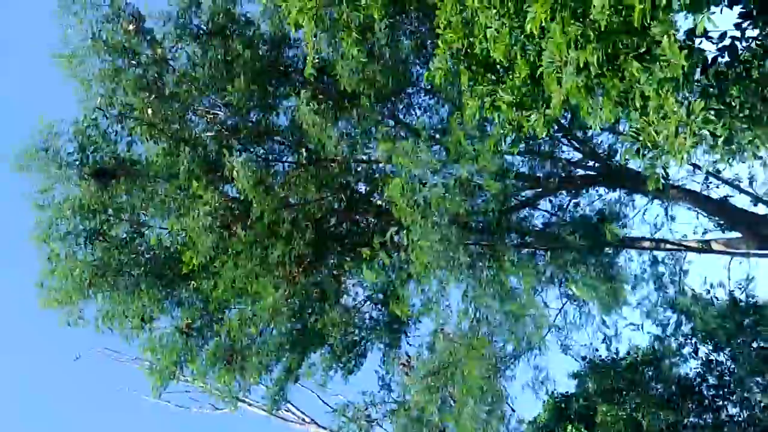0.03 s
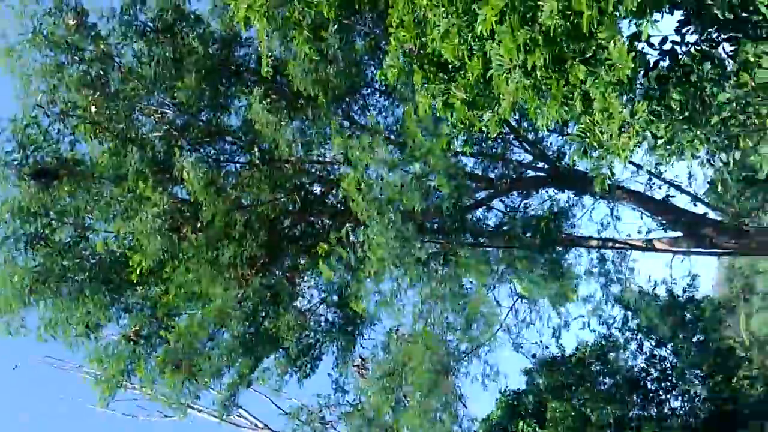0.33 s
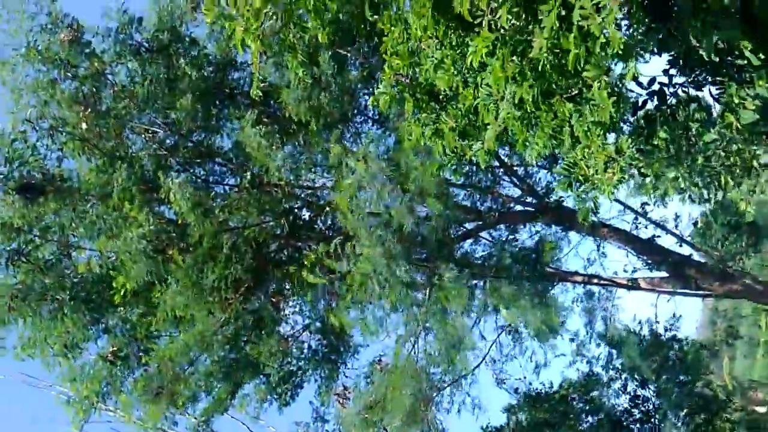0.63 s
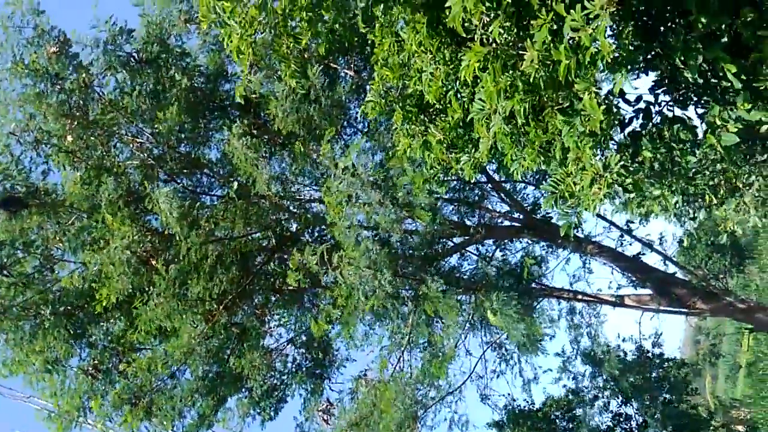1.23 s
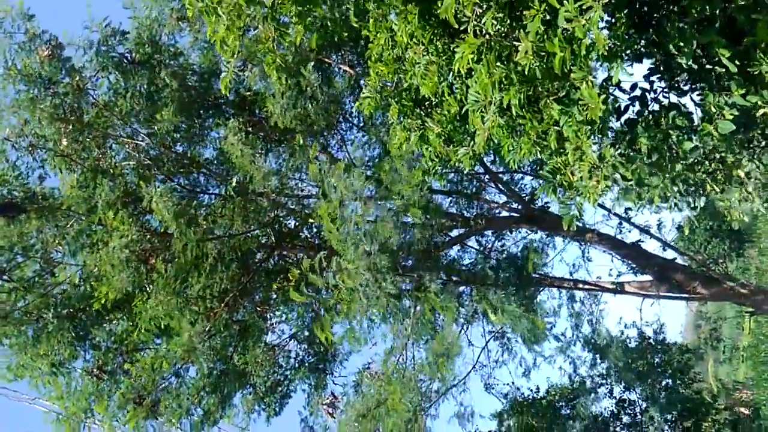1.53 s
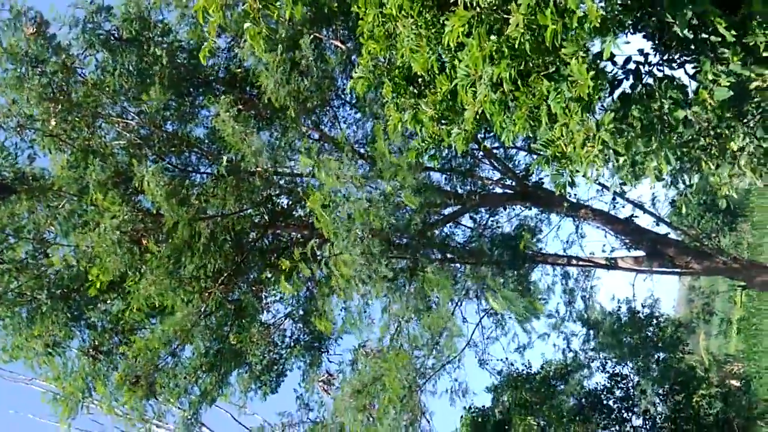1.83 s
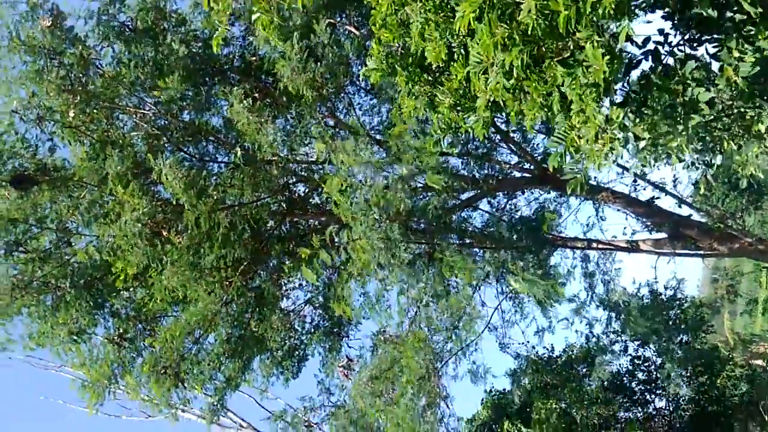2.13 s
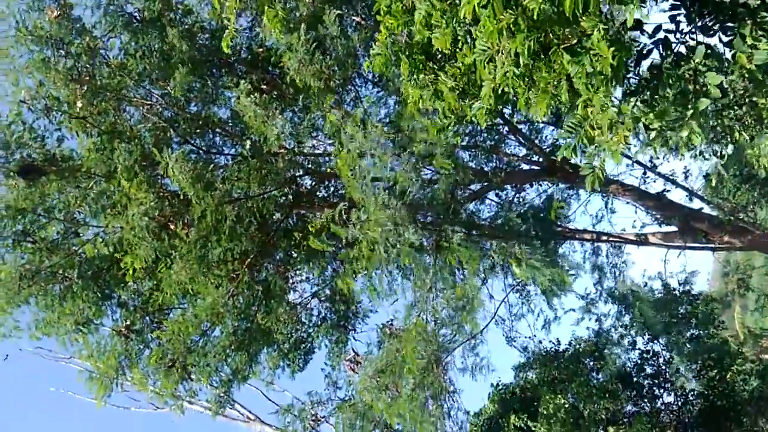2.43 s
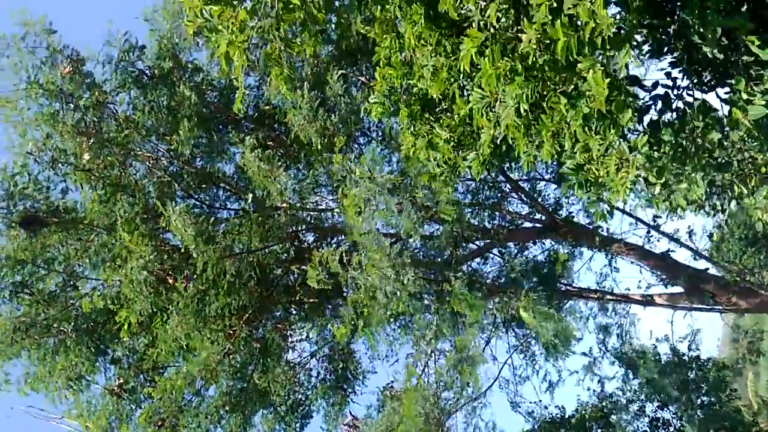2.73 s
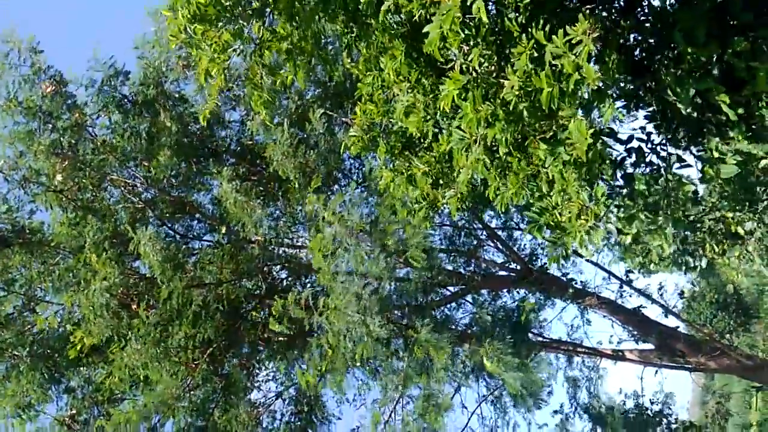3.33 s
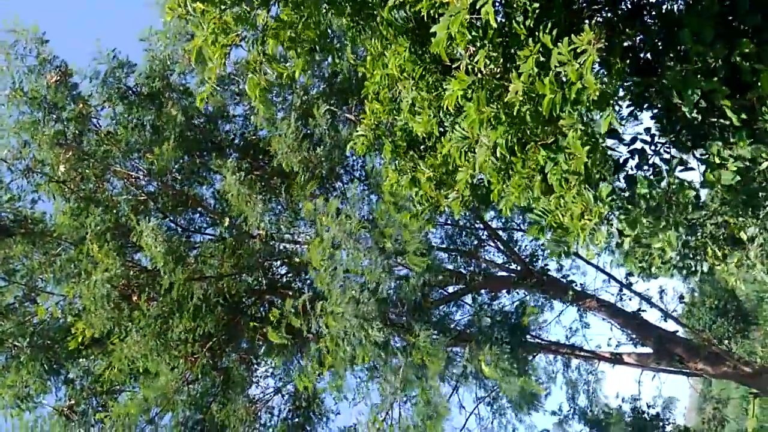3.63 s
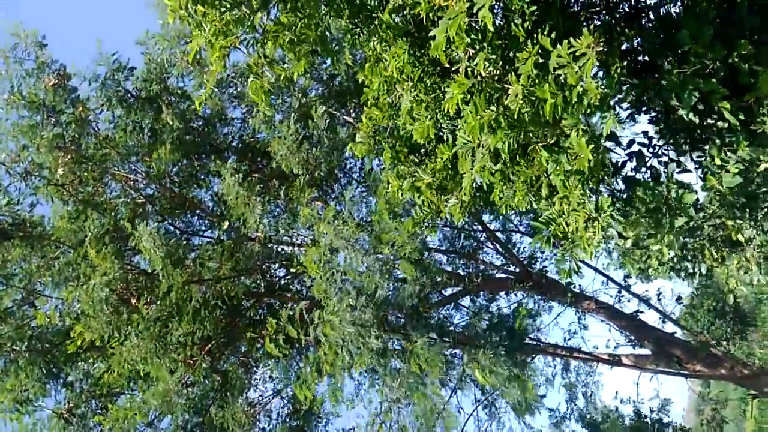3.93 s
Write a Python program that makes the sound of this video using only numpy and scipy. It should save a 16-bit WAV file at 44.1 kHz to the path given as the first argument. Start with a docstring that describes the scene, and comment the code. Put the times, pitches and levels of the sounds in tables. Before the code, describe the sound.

A bird whistles a loud, clear two-note call three times, each echoing softly among trees. A small bird twitters faintly and high in between, while leaves hiss quietly and a breeze rumbles on the microphone.

```python
"""In a wood, a bird whistles a loud, fluting two-note call three times over; trunks and leaves
scatter it into a soft tail. A small bird twitters high above it in quick sliding whistles.
Far off, other birds call and an animal repeats a cry made hoarse by a throb in its voice.
Leaves hiss faintly and stir once, a breeze buffets the microphone, and a dull scuff comes at the end."""
import sys
import numpy as np
from scipy import signal
from scipy.fft import rfft, irfft
from scipy.io import wavfile
from scipy.ndimage import uniform_filter1d

SR = 44100
rng = np.random.default_rng(int(sys.argv[2]) if len(sys.argv) > 2 else 0)


def digitize_waveform(pressure):
    """Quantize a signal to 16-bit integers and store it at the path in sys.argv[1].

    Rows of a 2-D input are taken as channels; values are limited to [-1, 1].
    """
    field = np.atleast_2d(pressure).T
    bounded = np.clip(field, -1, 1)
    quanta = np.round(bounded * 32767).astype(np.int16)
    wavfile.write(sys.argv[1], SR, quanta)


N = 176400
T = np.arange(N) / SR
LEAD = SR   # the calls' tracks begin one second early, so the wood is already ringing at the start


def from_db(db):
    """Turn decibels into a gain."""
    return 10 ** (np.asarray(db) / 20)


def rms_one(x):
    """Scale a signal to an average strength (rms) of 1."""
    return x / np.sqrt(np.mean(x ** 2) + 1e-20)


def in_time(rows):
    """Join (time_s, value) points with straight lines, giving a value at every sample."""
    return np.interp(T, *np.transpose(rows))


def drift(rate_hz, size):
    """A smooth random wobble of about 1 either way; a higher rate wobbles faster."""
    step = 40   # samples between random values
    memory = np.exp(-2 * np.pi * rate_hz * step / SR)
    draws = rng.standard_normal(N // step + 2002)
    slow = signal.lfilter([1], [1, -2 * memory, memory * memory], draws)[2000:]
    return np.interp(np.arange(size) / step, np.arange(len(slow)), rms_one(slow))


def colour(x, points):
    """Turn a sound's lows and highs up or down along (frequency_hz, gain_db) points."""
    hz, db = np.transpose(points)
    gain_db = np.interp(np.log(np.fft.rfftfreq(N, 1 / SR) + 1), np.log(hz), db)
    return irfft(rfft(x) * from_db(gain_db), N)


def noise(points):
    """Noise of strength 1, its tone set by (frequency_hz, gain_db) points."""
    return rms_one(colour(rng.standard_normal(N), points))


def add(out, start_s, x):
    """Mix a sound into a track that begins LEAD samples early."""
    i = max(int(start_s * SR) + LEAD, 0)
    out[i:i + len(x)] += x[:len(out) - i]


def whistle_notes(shape, notes):
    """A nearly pure whistle glides along a shape; high notes are pressed and so brighter."""
    # faint higher tones: pitch_multiple, level_db, growth_db_per_octave, flutter_radians
    overtones = [(2, -41, 40, .1), (3, -25.5, 77, .2), (4, -49, 33.5, .7), (5, -56, 2, 1.0),
                 (6, -41.5, 42, 1.1), (7, -51.5, 3, 1.4)]
    reference_hz, growth_floor_db = 2145, -21
    catch_s, catch_width_s, catch_db = .737, 0.0064, 50   # the voice catches once
    out = np.zeros(N + LEAD)
    shape_s, shape_hz, shape_db = np.transpose(shape)
    for start_s, pitch_ratio, stretch, level_db, bright_db in notes:
        t = np.arange(int(shape_s[-1] * stretch * SR)) / SR
        glide_hz = uniform_filter1d(np.interp(t / stretch, shape_s, shape_hz), size=400, mode="nearest")
        hz = pitch_ratio * glide_hz * (1 + 0.002 * drift(43, len(t)))
        phase = 2 * np.pi * np.cumsum(hz) / SR
        db = np.interp(t / stretch, shape_s, shape_db) + level_db + 1.2 * drift(30, len(t))
        db -= catch_db * np.exp(-((start_s + t - catch_s) / catch_width_s) ** 2)
        tone = np.sin(phase)
        for multiple, overtone_db, db_per_octave, flutter in overtones:
            growth_db = np.maximum(db_per_octave * np.log2(hz / reference_hz), growth_floor_db)
            gain = from_db(overtone_db + bright_db + growth_db + 3 * drift(74, len(t)))
            tone += gain * np.sin(multiple * phase + flutter * drift(170, len(t)))
        fade = np.clip(np.minimum(t, t[-1] - t) / .008, 0, 1)   # 8 ms at each end
        add(out, start_s, fade * from_db(db) * tone)
    return out


def whistling_bird():
    """The loud bird's call: a note that arches twice, then a swoop that ends in a warble."""
    # the shape of each note: time_in_note_s, pitch_hz, level_db
    arch = [(0, 1520, -53), (.015, 1884, -42), (.033, 2134, -33.5), (.052, 2180, -29), (.086, 2080, -28),
            (.127, 2206, -28), (.162, 2215, -28.5), (.193, 1985, -28.5), (.223, 1799, -32.5),
            (.243, 1626, -46.5), (.253, 1590, -74.5)]
    swoop = [(0, 1493, -55), (.019, 2094, -38.5), (.034, 2315, -32), (.049, 2354, -29.5),
             (.067, 2279, -30.5), (.094, 1900, -33), (.116, 1737, -31), (.149, 1427, -47.5),
             (.174, 1367, -55), (.189, 1461, -47), (.202, 1753, -34), (.214, 1937, -32),
             (.231, 1738, -31.5), (.249, 1895, -32), (.272, 1818, -33.5), (.298, 1786, -38),
             (.312, 1680, -42.5), (.322, 1630, -53.5)]
    # each time it is sung: start_s, pitch_ratio, length_ratio, level_db, overtones_db
    arches = [(0.653, 0.99, 1.01, -4.5, 1.5), (2.185, 1.0, 1.006, -3, -1), (3.539, 1.045, 1.06, -3, 0)]
    swoops = [(-.57, .98, 1.0, 0, 0), (1.029, .998, 1.0, 0, 1.5), (2.559, 1.0, 1.016, 0, 1),
              (3.926, 1.027, 1.0, -2, -1.5)]
    return whistle_notes(arch, arches) + whistle_notes(swoop, swoops)


def tree_echoes(x):
    """Dense echoes: a quick bloom from near treetops and a longer, duller tail from the wood."""
    first_echo_s, build_s = 0.0044, 0.0036
    t = np.arange(int(1.5 * SR)) / SR
    swell = 1 - np.exp(-np.maximum(t - first_echo_s, 0) / build_s)

    def scatter(level_db, fade_s):
        """Countless echoes blur into noise that falls 60 dB in fade_s."""
        return from_db(level_db) * rms_one(rng.standard_normal(len(t)) * swell * from_db(-60 * t / fade_s))

    early = scatter(level_db=-11.5, fade_s=0.74)
    late = scatter(level_db=-15.5, fade_s=0.94)
    foliage = signal.butter(2, 3930, fs=SR, output="sos")   # leaves soak up the tail's treble
    echoes = early + signal.sosfilt(foliage, late)
    return signal.fftconvolve(x, echoes / np.sqrt(len(t)))[:len(x)]


def leaves_and_airy_hiss(whistle):
    """Leaves hiss and stir once, and an airy hiss follows the whistle; in stereo, wide only up high."""
    # loudness of the leaves and of an extra high hiss: time_s, level_db
    leaf_levels = [(0, -68), (.55, -73), (1.3, -65.5), (1.7, -68.5), (2.15, -68.5), (2.8, -68.5),
                   (3.3, -71), (4, -69.5)]
    treble_levels = [(0, -77.5), (.55, -76), (.75, -70), (1.0, -75), (1.15, -81), (1.45, -79), (1.9, -80),
                     (2.15, -90), (2.4, -68.5), (2.55, -79), (2.88, -78), (2.98, -87), (3.5, -85),
                     (3.65, -73), (3.88, -77), (4, -83)]
    # the tone of each hiss: frequency_hz, gain_db
    leaf_tone = [(100, -2.5), (400, -0.5), (900, 0), (1500, -2), (3000, -2.5), (3800, -3), (5000, 2),
                 (5800, 9), (6700, 6.5), (7500, -2), (10000, -7), (14000, -14.5)]
    treble_tone = [(5000, -24), (7000, 1.5), (8500, 2.5), (11000, -4), (14000, -2)]
    rustle_tone = [(2500, -23), (4200, -15.5), (5800, 1.5), (7500, -11), (10000, -19.5), (14000, -24.5)]
    airy_tone = [(2500, -37.5), (3600, -30), (4400, 8.5), (5200, -2.5), (6400, 12), (7600, -19), (9200, -2),
                 (11000, -12.5), (13000, 0), (14000, -13)]
    # how much left and right differ: frequency_hz, gain_db
    width = [(100, -51), (3300, -39.5), (4800, -25.5), (6500, -11), (9000, -4), (14000, -5.5)]
    rustle_s, rustle_width_s = 1.546, 0.082
    leaves = from_db(in_time(leaf_levels) + .5 * drift(50, N))
    treble = from_db(in_time(treble_levels))
    rustle = from_db(-59 + 2 * drift(70, N)) * np.exp(-np.abs(T - rustle_s) / rustle_width_s)
    airy = from_db(-35.5) * uniform_filter1d(np.abs(whistle), size=900)
    layers = [(leaves, leaf_tone), (treble, treble_tone), (rustle, rustle_tone), (airy, airy_tone)]
    centre = sum(gain * noise(tone) for gain, tone in layers)
    side = sum(gain * noise(tone) for gain, tone in layers)
    return centre + colour(side, width) * np.array([[1], [-1]])


def breeze():
    """Wind on the microphone makes a lumpy rumble, with a higher flutter in some gusts."""
    # loudness of the rumble and the flutter: time_s, level_db
    rumble_levels = [(0.0, -90), (0.04, -59.5), (.09, -76), (0.11, -51.5), (.25, -63), (0.4, -61.5),
                     (0.43, -39), (0.56, -34.5), (0.66, -43), (.7, -40), (0.91, -39), (0.935, -52.5),
                     (1.03, -37), (1.13, -39), (1.18, -45), (1.24, -30.5), (1.365, -48.5), (1.39, -38.5),
                     (1.46, -41.5), (1.535, -51.5), (1.57, -36.5), (1.85, -37.5), (1.885, -47), (1.93, -38),
                     (1.99, -30.5), (2.04, -53), (2.07, -39), (2.26, -34.5), (3.0, -36), (3.12, -32),
                     (3.26, -43), (3.34, -40), (3.48, -41.5), (3.52, -33), (3.62, -35), (3.68, -46.5),
                     (3.75, -40.5), (4, -35.5)]
    flutter_levels = [(0, -94), (1.85, -79), (2.1, -62.5), (2.3, -55), (2.56, -84), (2.92, -56.5),
                      (3.25, -71.5), (3.56, -70.5), (3.75, -84), (4, -49.5)]
    # their tones: frequency_hz, gain_db
    rumble_tone = [(12, -43), (24, -25.5), (35, -10), (48, 2.5), (64, 7.5), (90, 1.5), (125, -3.5),
                   (165, -10), (245, -25.5), (350, -49), (500, -51), (800, -65.5), (1500, -80)]
    flutter_tone = [(80, -32.5), (200, 10), (300, 0.5), (450, -10.5), (700, -27.5), (1100, -22.5),
                    (2500, -54)]
    gusts = from_db(in_time(rumble_levels) - 1.5 + 2.5 * drift(39, N))
    rumble = noise(rumble_tone)
    swells = np.sqrt(uniform_filter1d(rumble ** 2, size=int(.05 * SR)) + .05)
    even_rumble = rumble / swells   # take out the noise's own chance swells
    flutter = from_db(in_time(flutter_levels) + 5 * drift(21, N)) * noise(flutter_tone)
    return gusts * even_rumble + flutter


def sliding_whistles(rows, bend_hz, jitter):
    """Short whistles that swell and fade as they slide, their pitch bent in the middle."""
    big_drop_hz, hang_hz = 1450, 550   # whistles that fall this far hang, then plunge
    out = np.zeros(N + LEAD)
    for start_s, length_s, from_hz, to_hz, level_db in rows:
        progress = np.linspace(0, 1, int(length_s * SR))
        hump = np.sin(np.pi * progress)
        hump_hz = hang_hz if from_hz - to_hz > big_drop_hz else bend_hz
        hz = from_hz + (to_hz - from_hz) * progress + hump_hz * hump
        hz *= 1 + jitter * drift(90, len(progress))
        add(out, start_s, from_db(level_db) * hump * np.sin(2 * np.pi * np.cumsum(hz) / SR))
    return out


def far_birds():
    """Distant birds give faint, gently falling whistles."""
    # each call: start_s, length_s, from_hz, to_hz, level_db
    calls = [(.02, 0.15, 2800, 2640, -77), (1.35, .38, 920, 842, -77.5), (2.04, .087, 2630, 2500, -69.5),
             (3.08, 0.46, 2673, 2270, -76)]
    return sliding_whistles(calls, bend_hz=11, jitter=0.0041)


def small_bird():
    """A small bird twitters in quick, high, sliding whistles."""
    # each chirp: start_s, length_s, from_hz, to_hz, level_db
    chirps = [(.31, 0.036, 5900, 5060, -67), (.475, 0.051, 4030, 3724, -66), (.51, 0.015, 3800, 4620, -67),
              (.522, 0.038, 5800, 5170, -60), (.568, 0.048, 6500, 5060, -55),
              (.715, 0.047, 5350, 5000, -66), (.748, 0.03, 6580, 4500, -60), (.82, 0.049, 5910, 5340, -58),
              (.84, 0.033, 6360, 5030, -50.5), (1.0, 0.029, 5280, 5000, -63),
              (1.075, 0.033, 4000, 3760, -66), (1.104, 0.015, 3890, 4870, -60),
              (1.118, 0.036, 5710, 5210, -51), (1.215, 0.042, 5870, 5800, -60),
              (1.305, 0.028, 5350, 4900, -63), (1.336, 0.026, 6900, 4630, -55.5),
              (1.402, 0.018, 4030, 4770, -58), (1.416, 0.031, 5780, 5300, -49.5),
              (1.642, 0.015, 6800, 4700, -61), (1.718, 0.036, 5800, 5180, -48),
              (1.905, .04, 4810, 4540, -59.5), (1.93, 0.035, 5800, 5200, -60),
              (1.968, 0.029, 5730, 5220, -56), (1.99, 0.026, 6070, 5650, -54.5),
              (2.695, 0.027, 4720, 3900, -64), (2.757, 0.025, 5750, 5100, -61),
              (3.078, 0.024, 7150, 6640, -60.5), (3.11, 0.02, 7000, 6200, -62.5),
              (3.462, 0.014, 5130, 4770, -65), (3.49, 0.014, 6630, 5250, -65),
              (3.525, 0.041, 3990, 3650, -64), (3.55, .014, 3770, 4780, -59.5),
              (3.56, 0.038, 5800, 5200, -50), (3.748, 0.029, 5400, 4950, -54),
              (3.781, 0.023, 7000, 4500, -50.5), (3.822, 0.044, 4000, 3690, -60.5),
              (3.849, 0.01, 3920, 4840, -54.5), (3.86, 0.027, 5940, 5240, -48.5)]
    return sliding_whistles(chirps, bend_hz=-100, jitter=.014)


def wind_buffets():
    """Single swirls of air hit the microphone, each with a short, low thump."""
    # each hit: start_s, level_db
    hits = [(0.424, -66), (0.553, -50), (0.687, -49.5), (0.789, -47), (0.857, -47), (1.05, -38.5),
            (1.201, -41.5), (1.25, -50), (1.55, -47), (1.968, -38), (2.134, -39), (2.216, -34.5),
            (2.246, -33.5), (2.309, -32), (2.341, -37.5), (2.404, -36), (2.457, -39.5), (2.655, -41),
            (2.696, -41.5), (2.782, -33), (2.847, -33), (2.888, -37.5), (2.93, -37.5), (2.952, -36),
            (3.011, -56), (3.057, -36), (3.142, -51.5), (3.505, -39), (3.552, -42), (3.624, -43)]
    # the tone of a thump: frequency_hz, gain_db
    thump_tone = [(30, -16.5), (70, -8), (140, 5.5), (220, 2), (330, -12.5), (480, -24), (800, -47.5),
                  (1500, -51.5), (3000, -90.5)]
    boost_db, rise_s, decay_s = 5.5, 0.0048, 0.012
    push = np.zeros(N)
    for start_s, level_db in hits:
        age = np.clip(T - start_s, 0, 1)
        push += from_db(level_db + boost_db) * (1 - np.exp(-age / rise_s)) * np.exp(-age / decay_s)
    return push * noise(thump_tone)


def far_cries():
    """A distant animal repeats one cry; a throb in its voice makes it hoarse."""
    # the cry rises, holds and drops: time_in_cry_s, pitch_hz, level_db
    shape = [(0, 1067, -13), (0.031, 1150, -6.5), (.06, 1263, -6), (.1, 1218, -1), (.175, 1235, -0.5),
             (.205, 1136, -5), (0.221, 1110, -23)]
    # each cry: start_s, pitch_ratio, length_ratio, level_db
    cries = [(1.791, 1.007, 0.9, -65), (2.216, 1.02, 1.0, -59.5), (2.71, 1.015, 0.97, -64),
             (3.201, 1.02, 0.97, -73)]
    throb_hz, throb_depth = 92.1, 0.54
    out = np.zeros(N + LEAD)
    shape_s, shape_hz, shape_db = np.transpose(shape)
    for start_s, pitch_ratio, stretch, level_db in cries:
        t = np.arange(int(shape_s[-1] * stretch * SR)) / SR
        hz = pitch_ratio * np.interp(t / stretch, shape_s, shape_hz)
        gain = from_db(level_db + np.interp(t / stretch, shape_s, shape_db))
        throb = 1 + throb_depth * np.sin(2 * np.pi * throb_hz * t + drift(30, len(t)))
        fade_in = np.minimum(t / .008, 1)
        add(out, start_s, fade_in * throb * gain * np.sin(2 * np.pi * np.cumsum(hz) / SR))
    return out


def scuff():
    """A dull scuff of noise sets in just before the end."""
    # its tone: frequency_hz, gain_db
    tone = [(100, 11.5), (250, 8), (450, 2.5), (750, -11), (1150, -2), (1600, -28), (3000, -37),
            (9000, -26), (14000, -40)]
    start_s, rise_s, level_db = 3.943, 0.0048, -45
    return from_db(level_db) * np.clip((T - start_s) / rise_s, 0, 1) * noise(tone)


def scene():
    """Calls from three distances echo in one wood, over leaves and wind."""
    near = whistling_bird()
    small = small_bird()
    far = far_birds() + far_cries()
    direct = near + from_db(0.5) * small + from_db(-0.5) * far
    calls = direct + tree_echoes(near + from_db(2.5) * small + far)
    return calls[LEAD:] + breeze() + scuff() + wind_buffets() + leaves_and_airy_hiss(near[LEAD:])


def record(dry):
    """The microphone opens with a quick fade, and the highest treble is cut."""
    open_s, fade_s, cutoff_hz = 0.036, 0.011, 14300
    opened = dry * np.clip((T - open_s) / fade_s, 0, 1)
    return signal.sosfilt(signal.ellip(12, .1, 80, cutoff_hz, fs=SR, output="sos"), opened)


dry = scene()
out = record(dry)
digitize_waveform(out)
```